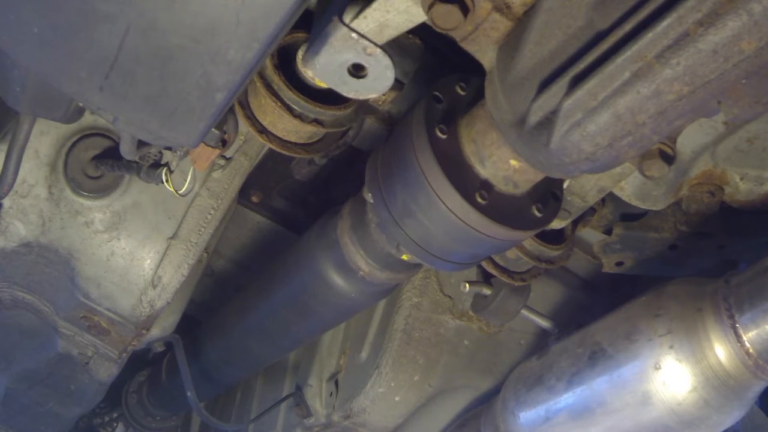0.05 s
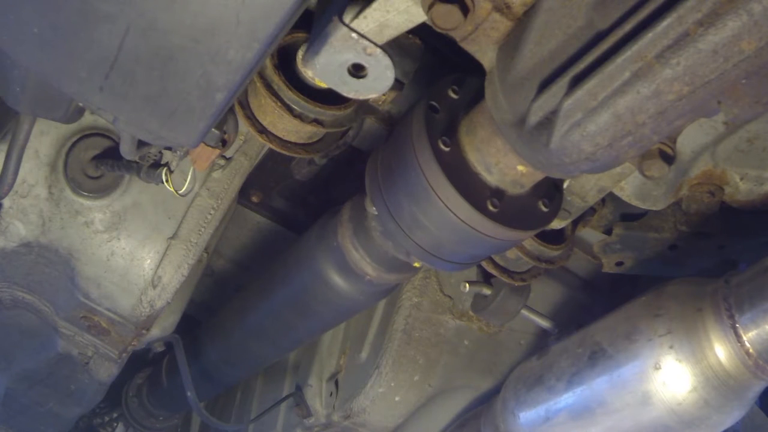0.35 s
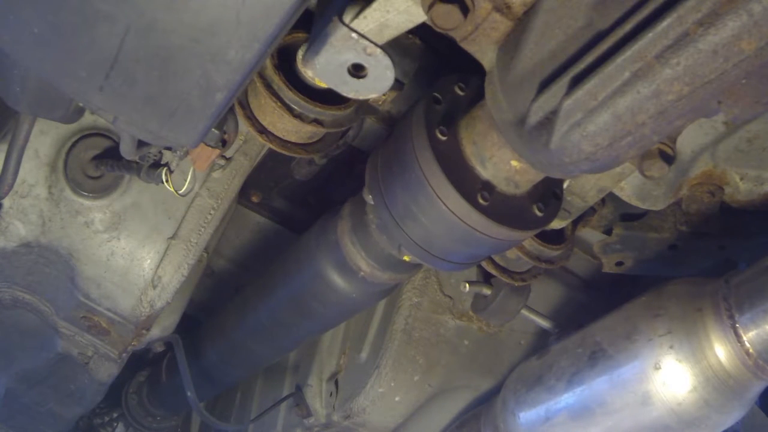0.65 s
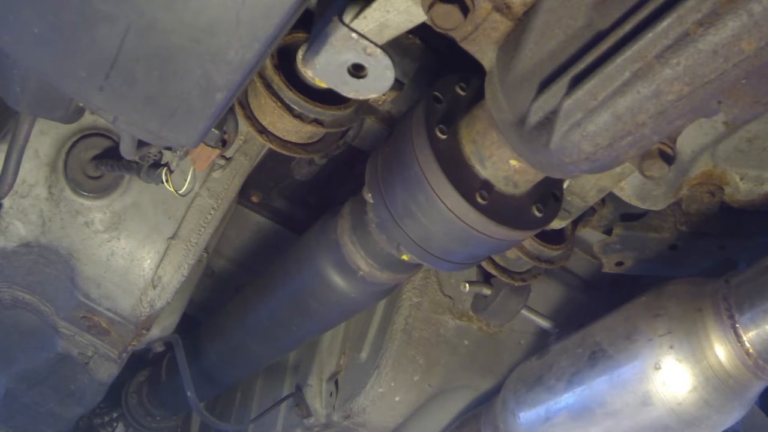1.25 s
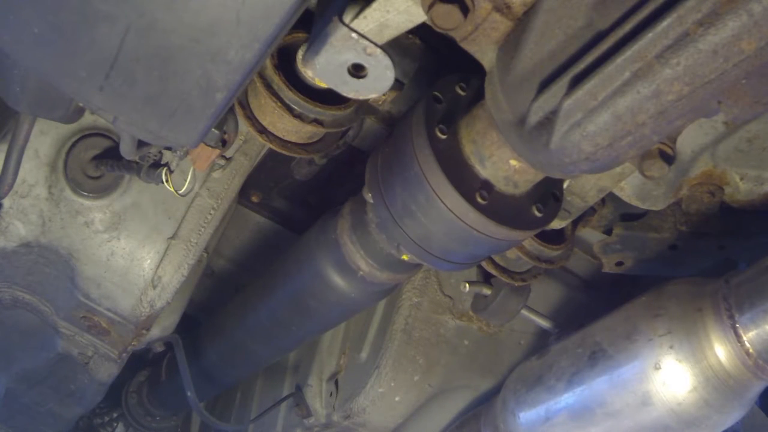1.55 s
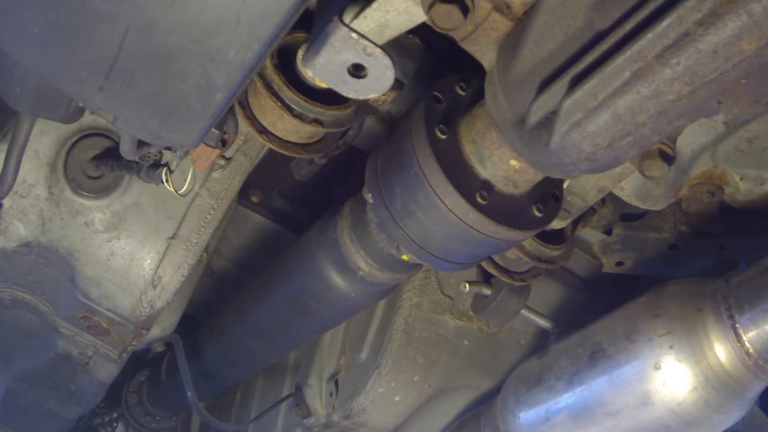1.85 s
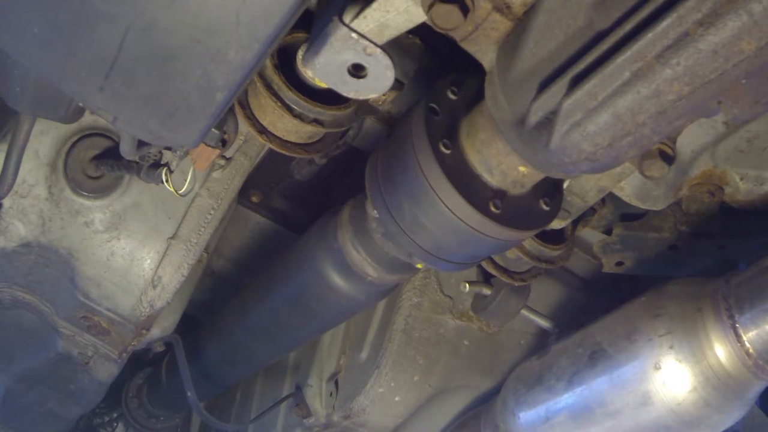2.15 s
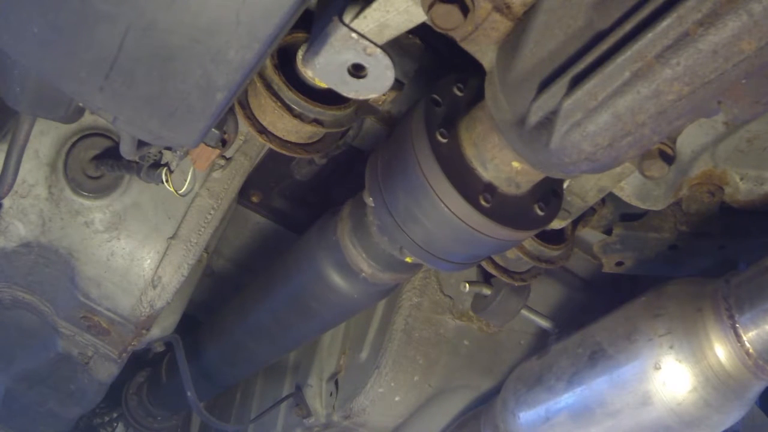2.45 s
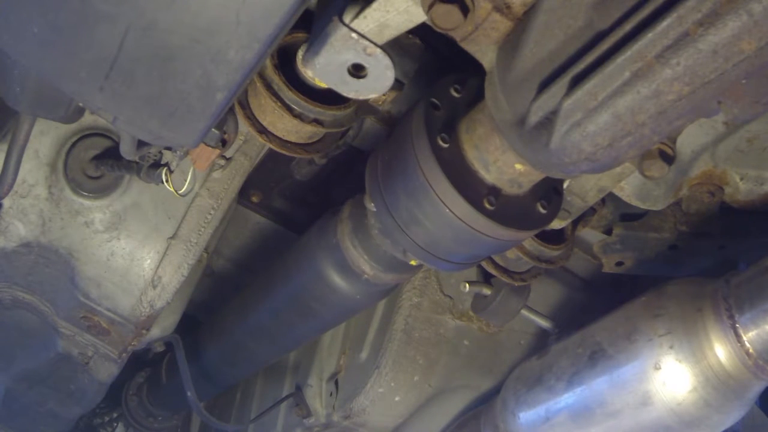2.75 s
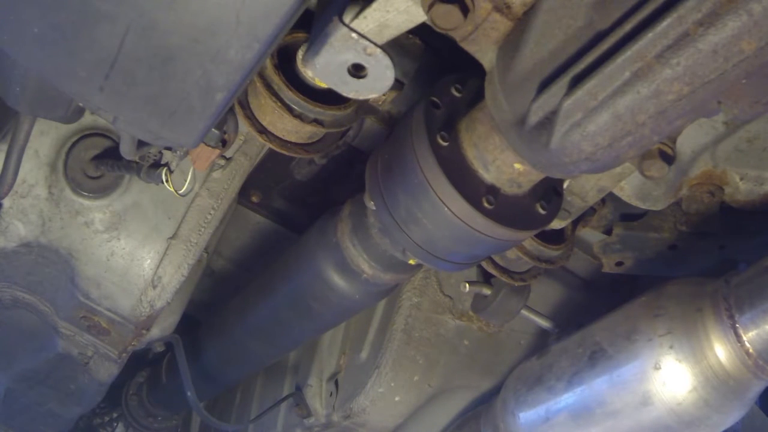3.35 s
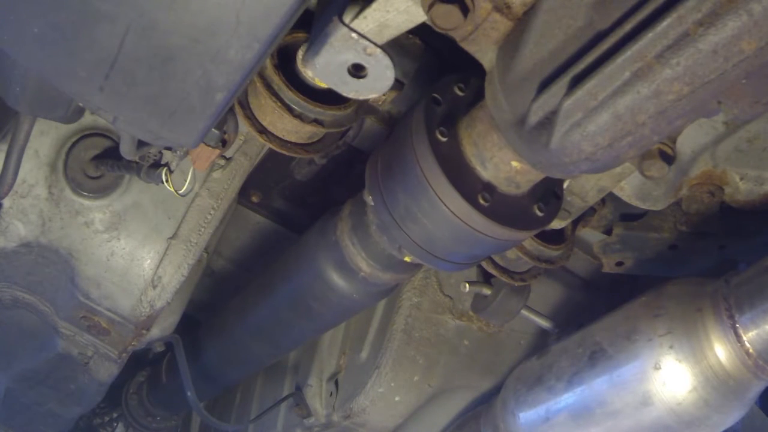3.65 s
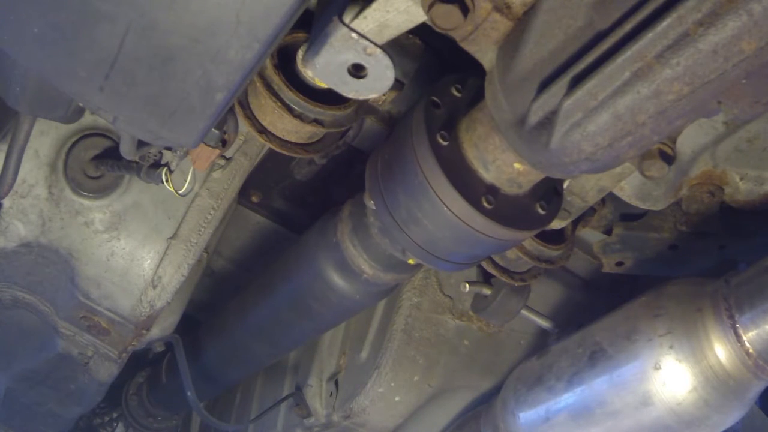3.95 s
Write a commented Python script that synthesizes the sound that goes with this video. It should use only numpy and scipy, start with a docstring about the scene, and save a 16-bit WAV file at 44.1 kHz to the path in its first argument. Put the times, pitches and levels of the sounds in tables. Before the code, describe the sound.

Short metal knocks and lighter return clacks alternate unevenly as play in a car's driveshaft closes, pausing briefly with a scuff, then resuming. The sound is close beneath the floor in a garage, with light ticks and steady air noise.

```python
"""Driveshaft play in a garage

A car's driveshaft is rocked back and forth, heard close up under the floor. Each swing takes up the
play in the joint: a touch, a hard blow and a rebound one way, a softer clack on the way back.
Hard knocks ring the floor tunnel. Small ticks, a brief scuff and faint rubbing fall in between,
over crackling grit, a low hum and steady air noise."""
import sys
import numpy as np
from scipy import signal
from scipy.fft import rfft, irfft
from scipy.io import wavfile
from scipy.ndimage import uniform_filter1d

SR = 44100
rng = np.random.default_rng(int(sys.argv[2]) if len(sys.argv) > 2 else 0)


def wav_record(signal):
    """Record a signal, one row per channel, as 16-bit PCM in the file named by sys.argv[1]."""
    frames = np.transpose(np.atleast_2d(signal))
    bounded = np.clip(frames, -1, 1)
    # unit amplitude maps onto the largest positive 16-bit level
    quanta = np.round(bounded * 32767).astype(np.int16)
    wavfile.write(sys.argv[1], SR, quanta)


N = 176400
THUD_HZ, CLICK_HZ = 514, 3020


def undb(db):
    return 10 ** (np.asarray(db) / 20)


def unit_rms(x):
    return x / np.sqrt(np.mean(x ** 2))


def decay(t, t60_s):
    return np.exp(-np.log(1000) * t / t60_s)


def gain_at(spectrum, hz):
    """Interpolate (freq_hz, gain_db) points over log frequency; linear gain out."""
    freq_hz, gain_db = np.array(spectrum, float).T
    return undb(np.interp(np.log(hz + 1e-9), np.log(freq_hz), gain_db))


def colour(x, spectrum):
    return irfft(rfft(x) * gain_at(spectrum, np.fft.rfftfreq(len(x), 1 / SR)), len(x))


def highpass(x, hz):
    return signal.sosfiltfilt(signal.butter(2, hz, "high", fs=SR, output="sos"), x)


def noise(spectrum):
    return unit_rms(colour(rng.standard_normal(N), spectrum))


def wander(hz):
    """Smooth random curve, unit RMS."""
    hold = max(int(SR / hz), 2)
    steps = np.repeat(rng.standard_normal(N // hold + 1), hold)
    return unit_rms(uniform_filter1d(steps, hold)[:N])


def add(out, start_s, x):
    i = max(int(start_s * SR), 0)
    out[i:i + len(x)] += x[:max(len(out) - i, 0)]


# Shaft and joint modes: pitch_hz, level_db, t60_s
SHAFT_MODES = [(316.2, -4, 0.21), (441, -15.5, 0.16), (558, -9, 0.059), (685, -6.5, 0.059),
               (930, -4.5, 0.06), (1067, -11.5, 0.14), (1282, -10.5, 0.14), (1553, -7, 0.12),
               (1648, 2.5, 0.044), (1796, 0, 0.053), (1914, -8, 0.054), (2135, -10, 0.076),
               (2630, -12, 0.051), (2860, -26, 0.039), (3480, -37, 0.011), (4010, -14, 0.036),
               (4860, -16.5, 0.024)]

def shaft_ring(t, scatter_db=1.5, detune=0.0059):
    """Struck shaft: damped modes, slightly different on each contact."""
    offset_db = scatter_db * rng.standard_normal(len(SHAFT_MODES))
    tuning = 1 + detune * rng.standard_normal(len(SHAFT_MODES))
    ring = 0
    for k, (pitch_hz, level_db, t60_s) in enumerate(SHAFT_MODES):
        wave = (-1) ** k * np.sin(2 * np.pi * pitch_hz * tuning[k] * t)
        ring += undb(level_db + offset_db[k]) * wave * decay(t, t60_s)
    return ring


def underbody_ring(t, spectrum, t60_s, treble_damping=0.2):
    """Dense underbody modes as noise bands; t60_s holds at CLICK_HZ, higher bands die faster."""
    hz = np.fft.rfftfreq(len(t), 1 / SR)
    gain = gain_at(spectrum, hz)
    white = rfft(rng.standard_normal(len(t)))
    edges_hz = np.geomspace(100, 16000, 16)
    ring = 0
    for low_hz, high_hz in zip(edges_hz, edges_hz[1:]):
        band = gain * (hz >= low_hz) * (hz < high_hz)
        fade = decay(t, t60_s * (CLICK_HZ / low_hz) ** treble_damping)
        share = np.sqrt(np.mean(fade ** 2) * np.sum(band ** 2) / np.sum(gain ** 2))
        ring += share * unit_rms(irfft(white * band, len(t)) * fade)
    return ring


def contact(spectrum, t60_s, thud_db, click_db, body_db, shaft_db, rise_s=0.00079):
    """One metal contact rings underbody and shaft; thud and click shelve the bass and treble."""
    t = np.arange(12000) / SR
    ring = undb(body_db) * underbody_ring(t, spectrum, t60_s) + undb(shaft_db) * shaft_ring(t)
    thud = ring - highpass(ring, THUD_HZ)
    click = highpass(ring, CLICK_HZ)
    shelved = ring + (undb(thud_db) - 1) * thud + (undb(click_db) - 1) * click
    return shelved * np.minimum(t / rise_s, 1)


def shaft_tube(x, gain_db, pitch_hz=1760, width_hz=230):
    """The tube rings more or less, depending on how the joint seats."""
    b, a = signal.iirpeak(pitch_hz, pitch_hz / width_hz, fs=SR)
    return x + (undb(gain_db) - 1) * signal.lfilter(b, a, x)


# Underbody under a hard knock: freq_hz, gain_db
KNOCK_SPECTRUM = [(120, 0), (250, -42), (320, 2.5), (490, -14.5), (700, -9), (950, 0), (1400, -12),
                  (1680, 8.5), (2000, -13.5), (2350, -6.5), (2580, -23), (2850, -10.5), (3250, -20.5),
                  (3700, -14.5), (4450, -29), (4950, -16), (5400, -32.5), (6100, -26.5), (6800, -43),
                  (7800, -39), (8400, -32), (10000, -41.5), (15000, -56)]
# Hard knocks: start_s, level_db, rebound_s, rebound_db, thud_db, tube_db, click_db
KNOCKS = [(0.1982, 0.5, .0078, -4, 1.5, -14, 3.5), (0.7987, 0.5, .0085, -2.5, 2, -3.5, 0),
          (2.0403, -0.5, .0100, 0.5, -1.5, -6.5, -3), (2.6554, 2, .0100, -5, -5, 3, -0.5),
          (3.1985, 1, .0095, -2.5, -4.5, 1, -4.5), (3.7248, -1, .0102, 1, -5.5, -3.5, -4)]

def knocks(t60_s=0.044):
    """The play in the joint closes hard: four contacts in quick succession."""
    out = np.zeros(N)
    for start_s, level_db, rebound_s, rebound_db, thud_db, tube_db, click_db in KNOCKS:
        contacts = [(-0.0072, -6.5, -13),  # touch
                    (0, 0, 0),  # blow
                    (rebound_s, rebound_db, 1),
                    (rebound_s + 0.008, rebound_db - 8, 1)]  # settling
        for lag_s, force_db, edge_db in contacts:
            hit = contact(KNOCK_SPECTRUM, t60_s, thud_db, click_db + edge_db,
                          body_db=-23.5, shaft_db=-30.5)
            add(out, start_s + lag_s, undb(level_db + force_db) * shaft_tube(hit, tube_db))
    return out


# Underbody under a clack or tick: freq_hz, gain_db
SOFT_SPECTRUM = [(150, -27), (320, 0.5), (500, -11.5), (950, 0.5), (1350, -4.5), (1850, 5), (2150, -10.5),
                 (2550, -16), (2900, -15.5), (3800, -23.5), (4400, -35), (5000, -27), (6800, -55),
                 (15000, -58)]
# Return clacks: start_s, level_db, rebound_s, rebound_db, thud_db, click_db
CLACKS = [(.481, -1.5, 0.0049, -0.5, -2, 2.5), (1.070, -2, 0.0073, -8.5, 3, 3),
          (2.323, 1.5, 0.0057, -4.5, -5.5, 4.5), (2.8906, -1, .003, -3, -5, -6),
          (3.450, -2, 0.011, -6.5, -2.5, 2), (3.968, -2.5, .005, -12, 3, -1.5)]

def clacks(t60_s=0.05):
    """The play closes softly on the return swing: touch, blow, rebound."""
    out = np.zeros(N)
    for start_s, level_db, rebound_s, rebound_db, thud_db, click_db in CLACKS:
        for lag_s, force_db in ((-0.004, -7.5), (0, 0), (rebound_s, rebound_db)):
            hit = contact(SOFT_SPECTRUM, t60_s, thud_db, click_db, body_db=-32, shaft_db=-45)
            add(out, start_s + lag_s, undb(level_db + force_db) * hit)
    return out


# Light ticks: start_s, level_db, thud_db, click_db
TICKS = [(.003, -3.5, 2, 10), (0.053, -4, -5, 10), (0.165, -2, 12, -1), (0.302, -8.5, 3, 11.5),
         (0.577, -9, 15, -8), (.770, -2.5, 11, 0), (.842, -5, -5, 10), (.913, -6, 14, 7),
         (1.133, -3.5, -6, 8.5), (1.170, -3.5, 11, 5), (1.494, -2.5, -11, -4), (2.013, 2, 9.5, 2),
         (2.114, -9, 0, -6), (2.139, 1.5, 4, 3), (2.289, -6, 5, 0), (2.998, 2.5, 0.5, -8),
         (3.169, 2, 10.5, 3), (3.298, 3.5, 0.5, -12), (3.52, -4.5, -11, 4), (3.584, -3, 14.5, -6),
         (3.919, -7.5, 10, 3)]

def ticks(t60_s=0.057):
    """Loose parts make single light contacts."""
    out = np.zeros(N)
    for start_s, level_db, thud_db, click_db in TICKS:
        hit = contact(SOFT_SPECTRUM, t60_s, thud_db, click_db, body_db=-40.5, shaft_db=-53.5)
        add(out, start_s, undb(level_db) * hit)
    return out


# Floor tunnel modes: pitch_hz, level_db, t60_s
TUNNEL_MODES = [(272, 1, 0.34), (325.7, 4, .26), (337, 7, 0.22), (365, -3, .22), (407, 2, 0.19),
                (445, -2, 0.27), (537, -14, 0.23)]

def floor_tunnel(gain_db=-42, rise_s=0.041, detune=0.0598):
    """Each hard knock swells into a hollow ring between shaft and floor."""
    t, out = np.arange(20000) / SR, np.zeros(N)
    swell = np.minimum(t / rise_s, 1)
    for start_s, knock_db, _, _, thud_db, _, _ in KNOCKS:
        for pitch_hz, mode_db, t60_s in TUNNEL_MODES:
            detuned_hz = pitch_hz * (1 + detune * rng.standard_normal())
            wave = np.sin(2 * np.pi * (detuned_hz * t + rng.random()))
            gain = undb(gain_db + knock_db + thud_db + mode_db)
            add(out, start_s, gain * wave * decay(t, t60_s) * swell)
    return out


# Scuff noise: freq_hz, gain_db
SCUFF_SPECTRUM = [(200, 0.5), (500, -10), (1000, -1.5), (1400, -8.5), (1900, 0.5), (2400, -9), (2900, -14),
                  (3700, -5.5), (4400, -18.5), (5200, -10), (6500, -28), (7600, -21), (8350, -9),
                  (9300, -20.5), (12000, -27.5), (15000, -32)]
# Scuff strokes: start_s, rise_s, hold_s, release_s, level_db, treble_db
SCUFFS = [(1.101, 0.097, 0.04, 0.075, -45, -10), (1.221, 0.021, 0.0055, 0.017, -41, -2),
          (1.359, 0.0029, 0.021, 0.0044, -44.5, 7), (1.363, 0.0025, 0.005, 0.0041, -39.5, -24)]

def scuffs(grain):
    """Grainy friction, as of a grip shifting."""
    t, out = np.arange(N) / SR, np.zeros(N)
    scuff = noise(SCUFF_SPECTRUM) * grain
    treble = highpass(scuff, CLICK_HZ)
    for start_s, rise_s, hold_s, release_s, level_db, treble_db in SCUFFS:
        swell = np.interp(t, start_s + np.cumsum([0, rise_s, hold_s, release_s]), [0, 1, 1, 0])
        out += undb(level_db) * swell * (scuff + (undb(treble_db) - 1) * treble)
    return out


# Rubbing and grit noise: freq_hz, gain_db
RUB_SPECTRUM = [(300, 14), (1000, 1), (1900, 13.5), (2600, -5), (3600, -1), (4400, -10), (5100, -9.5),
                (6800, -23.5), (8300, -22.5), (11000, -27.5), (15000, -41)]
# Shaft rubs: centre_s, half_width_s, level_db
RUBS = [(0.016, 0.024, -50.5), (0.57, 0.074, -53.5), (1.866, 0.021, -56.5), (2.13, 0.063, -49),
        (2.43, 0.09, -50.5), (2.972, 0.079, -49.5), (3.58, 0.16, -55), (3.855, 0.035, -71)]

def rubbing(grain):
    """Faint swells of friction as the shaft turns."""
    t = np.arange(N) / SR
    swell = sum(undb(level_db) * np.exp(-((t - centre_s) / half_width_s) ** 2)
                for centre_s, half_width_s, level_db in RUBS)
    return swell * noise(RUB_SPECTRUM) * grain


def grit(rate_per_s=40, gain_db=-59.5, spread_db=4, decay_s=0.003):
    """Tiny random crackles of grit."""
    onsets = rng.random(N) < rate_per_s / SR
    strength = undb(spread_db * np.minimum(rng.exponential(size=N), 3))
    fade = np.exp(-np.arange(1500) / SR / decay_s)
    bursts = signal.fftconvolve(onsets * strength, fade)[:N]
    return undb(gain_db) * bursts * noise(RUB_SPECTRUM)


# Garage reverberation: freq_hz, gain_db
GARAGE_SPECTRUM = [(100, -32), (250, -4.5), (370, 1.5), (520, -0.5), (1000, -17), (1800, -19), (3500, -14),
                   (8000, -46), (15000, -27)]

def garage(x, t60_s=0.3, rise_s=0.0083):
    """Reflections build into a diffuse tail, strongest in the low mids."""
    t = np.arange(30000) / SR
    tail = rng.standard_normal(len(t)) * np.minimum(t / rise_s, 1) ** 2 * decay(t, t60_s)
    response = colour(unit_rms(tail) / np.sqrt(len(t)), GARAGE_SPECTRUM)
    return signal.fftconvolve(x, response)[:N]


# Rumble and air noise: freq_hz, gain_db
AIR_SPECTRUM = [(20, -7.5), (40, 4.5), (62, 3.5), (80, 6.5), (110, 0), (170, -4.5), (240, -13.5),
                (330, -16.5), (480, -20.5), (700, -18), (950, -15), (1300, -21.5), (1600, -18),
                (1900, -18.5), (2400, -34), (3200, -33.5), (4400, -45), (5100, -43.5), (6800, -49.5),
                (7800, -48.5), (8300, -47), (9500, -51), (15000, -51.5)]
# Upper bass of the rumble: time_s, gain_db
BOOM_LEVEL = [(0, -1), (.8, 0), (1.1, -6), (1.8, 0), (2.3, 2.5), (2.9, 1), (3.5, 3.5), (4, 6.5)]
# Air noise between bass and hiss: time_s, gain_db
MID_LEVEL = [(0, 1), (.4, 0.5), (.6, 1), (1.0, 1.5), (1.7, 1), (2.2, 3.5), (2.55, 3.5), (2.95, 2.5),
             (3.15, 3.5), (3.55, 5.5), (4, 4)]

def air_noise(level_db=-43.5, throb_db=2.5, flicker_db=0.8):
    """Throbbing rumble, flickering mids and even hiss, split from one noise."""
    t = np.arange(N) / SR
    air = undb(level_db) * noise(AIR_SPECTRUM)
    above_sub, above_bass, hiss = (highpass(air, hz) for hz in (83, 227, 6800))
    boom_db = np.interp(t, *np.array(BOOM_LEVEL).T)
    rumble = (air - above_sub) + (above_sub - above_bass) * undb(boom_db)
    mid_db = np.interp(t, *np.array(MID_LEVEL).T) + flicker_db * wander(hz=25.44)
    throb = unit_rms(undb(throb_db * wander(hz=14)))
    return rumble * throb + (above_bass - hiss) * undb(mid_db) + hiss


def hum(pitch_hz=82.7, level_db=-49, drift=0.024, waver_db=2):
    """A low tone wavering in pitch and level."""
    phase = 2 * np.pi * np.cumsum(pitch_hz * (1 + drift * wander(hz=8))) / SR
    tone = np.sin(phase) * undb(waver_db * wander(hz=6.27))
    return undb(level_db) * unit_rms(tone)


def scene(grain_db=1.5):
    """Mono mix; only the metal contacts feed the garage reverberation."""
    contacts = knocks() + clacks() + ticks()
    ringing = floor_tunnel() + garage(contacts)
    grain = unit_rms(undb(grain_db * wander(hz=410.5)))
    friction = scuffs(grain) + rubbing(grain)
    return (contacts + ringing + friction + grit() + air_noise() + hum())[None]


def record(dry):
    """Steep low-pass on the top treble."""
    cutoff_hz = 15400
    return signal.sosfilt(signal.ellip(10, .2, 70, cutoff_hz, fs=SR, output="sos"), dry)


dry = scene()
out = record(dry)
wav_record(out)
```